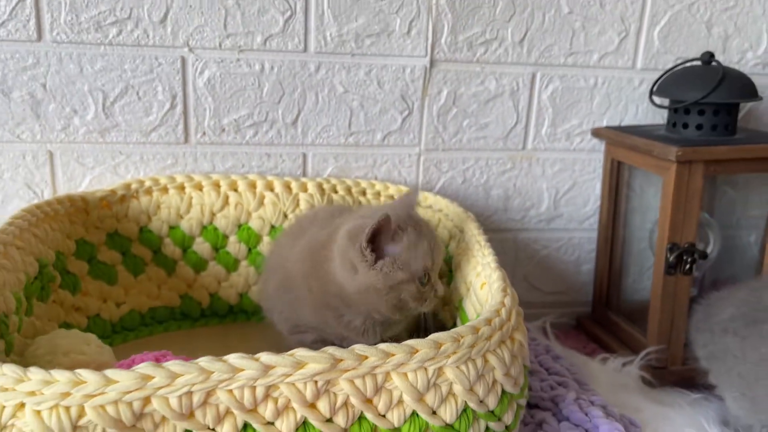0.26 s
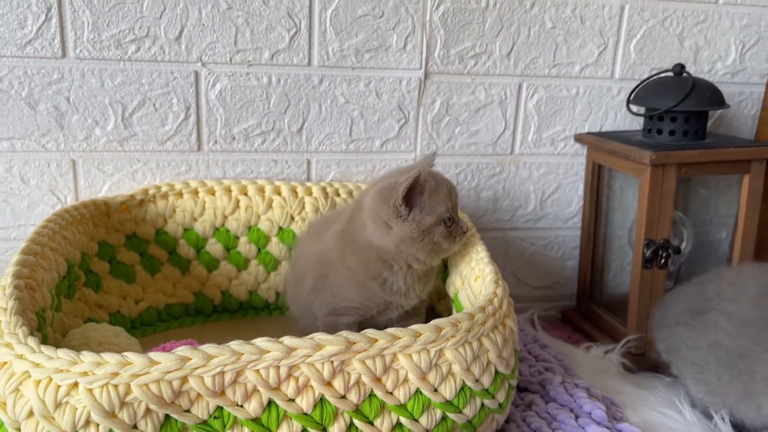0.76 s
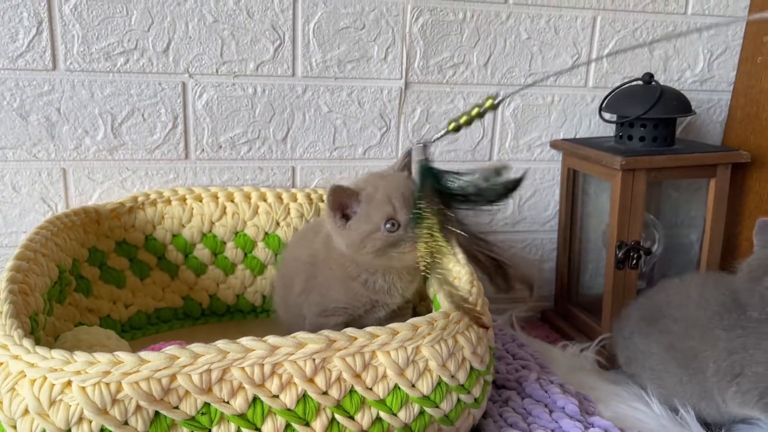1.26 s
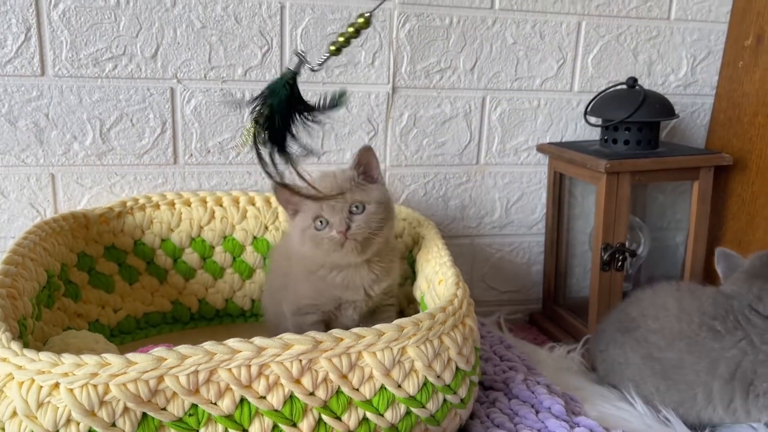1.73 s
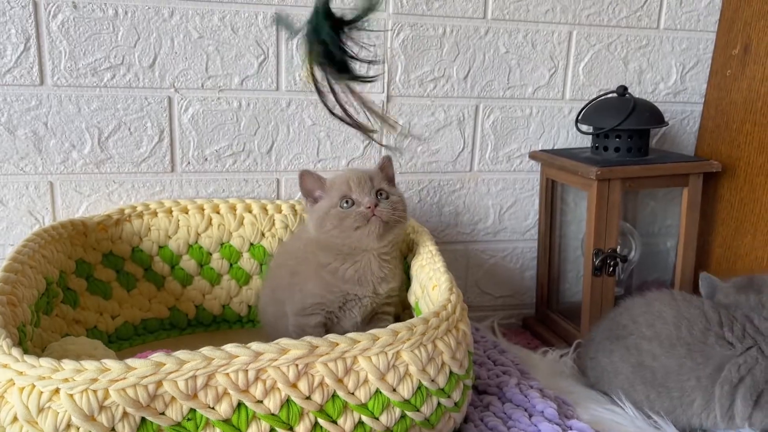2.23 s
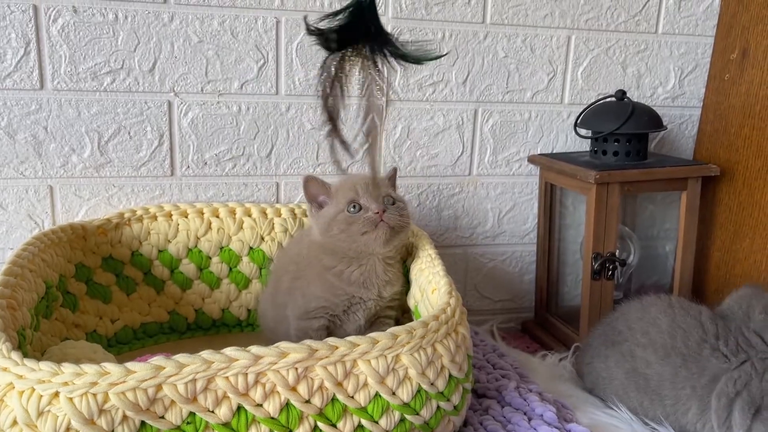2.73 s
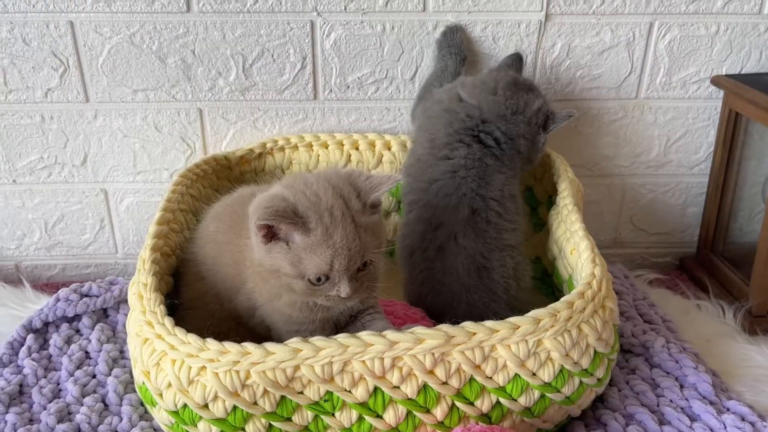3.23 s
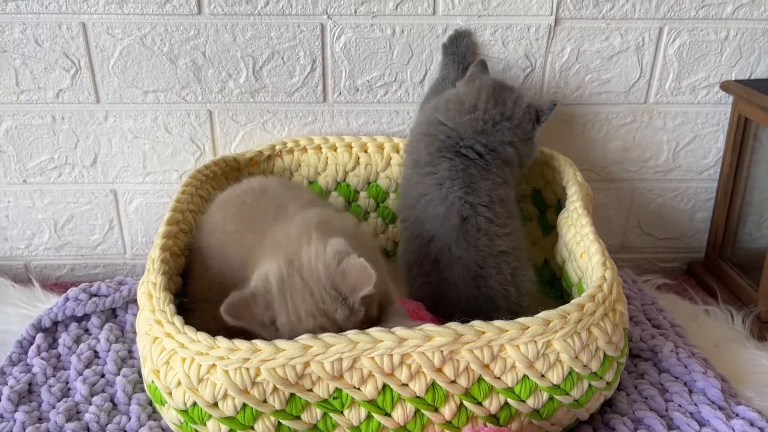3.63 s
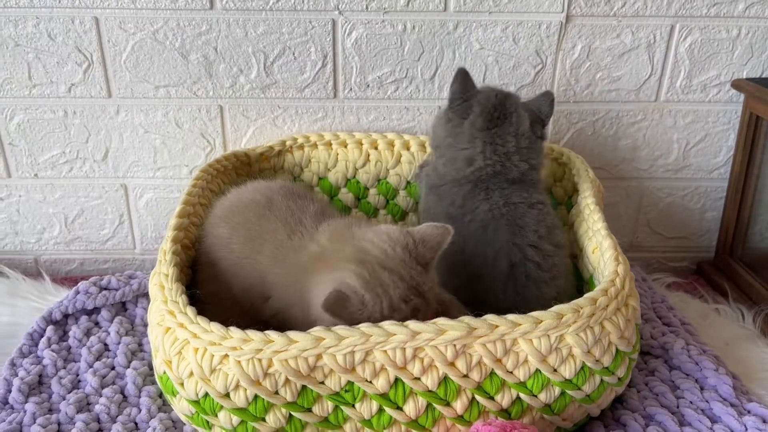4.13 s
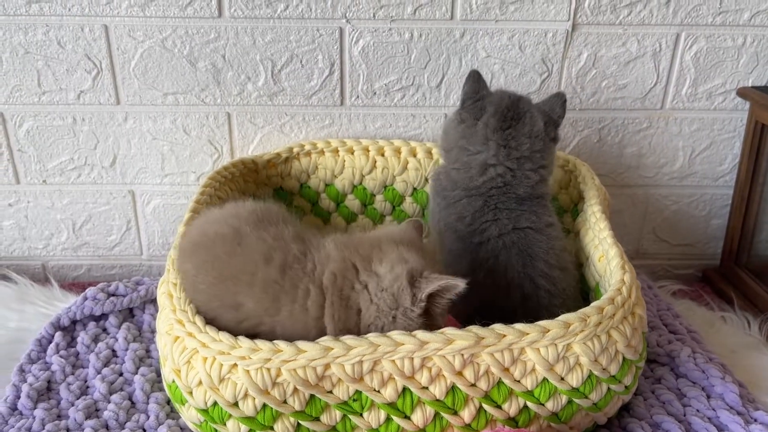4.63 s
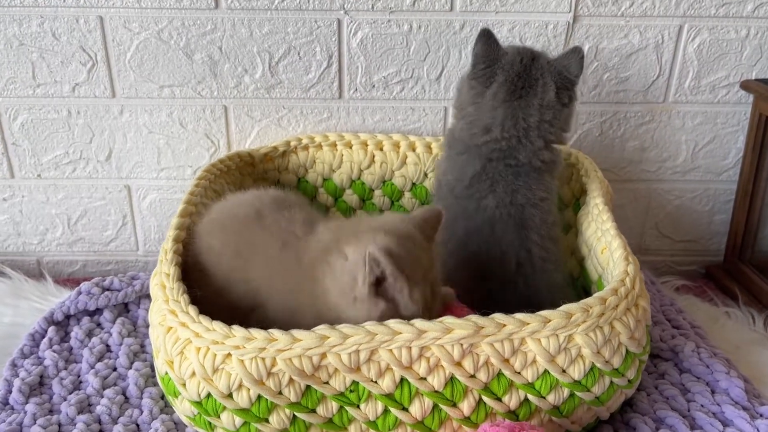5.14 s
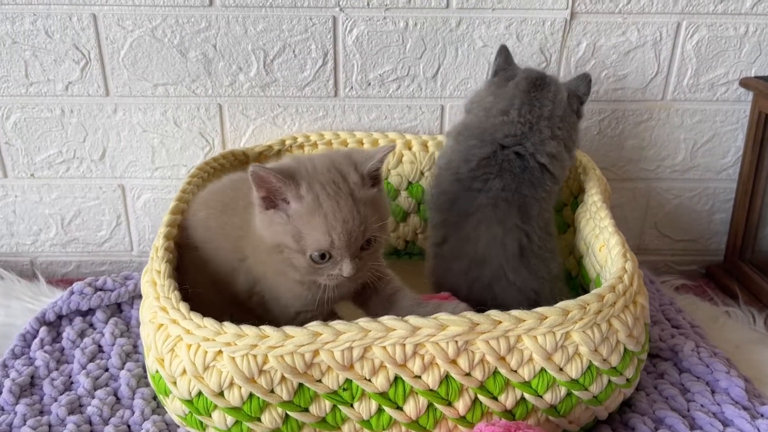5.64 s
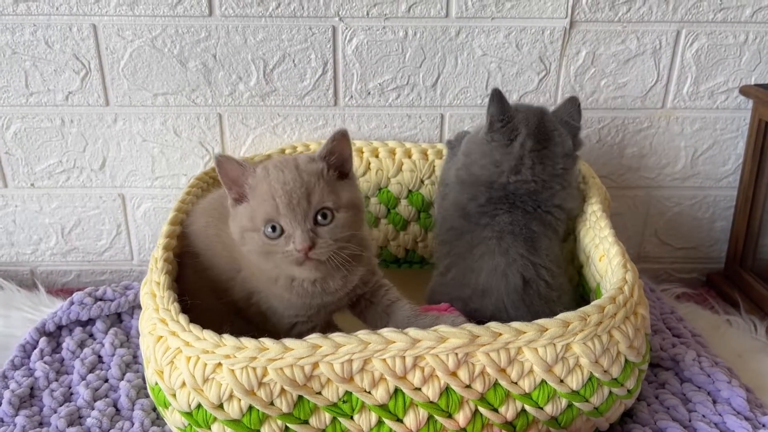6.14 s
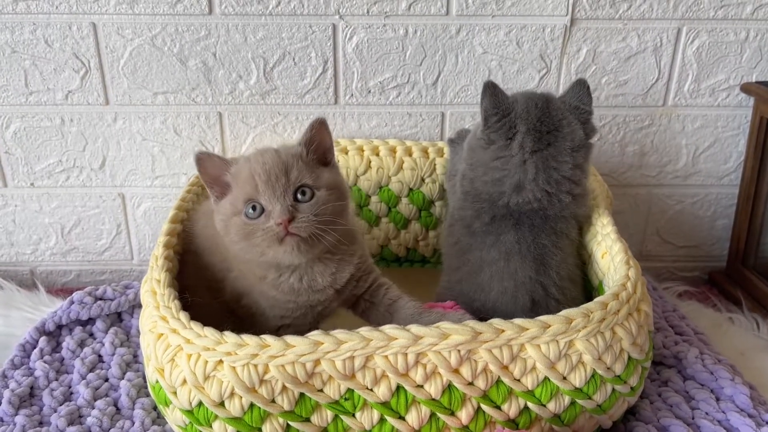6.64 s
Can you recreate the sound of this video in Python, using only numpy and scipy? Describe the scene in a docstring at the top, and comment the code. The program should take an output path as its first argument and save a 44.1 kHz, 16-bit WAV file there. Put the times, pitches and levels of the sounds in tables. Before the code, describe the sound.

A small furnished room, picked up close by a phone in stereo, near sounds slightly left. Dull distant traffic and a low wavering hum continue throughout. From 0 to 0.7 s come very faint taps and tiny dry ticks, one clearer near 0.5. From 1.25 to 1.9 a feather toy crackles in short, bright bunches with fine rustle, then near sounds almost stop. Traffic swells around 2.7 with a faint engine drone; at 3.05 the background abruptly shifts. A soft fur swish peaks at 3.3 over another faint engine. At 3.65-3.8 padded thuds and harder taps surround a loud, sharp snap at 3.74, with a very short noisy tail. A barely audible swish follows at 4.0. Rustle begins around 4.35, and from 4.5 to the end at 6.9 crisp, irregular crinkly ticks come in rapid jerks, strongest from 5.4 to 6.6, with light taps at 4.76 and 6.0.

```python
"""Distant traffic and a low hum run throughout, under soft knocks and bunches of dry ticks.
In two shots, a crinkly feather toy is shaken near kittens in a yarn basket in a small room.
Noise shaped into bursts makes the toy's ticks, rustle and swishes; noise also makes the traffic and hum.
Engines are sums of sine waves; the knocks and one sharp snap are short ringing tones.
"""
import sys
import numpy as np
from scipy import signal
from scipy.fft import rfft, irfft, next_fast_len
from scipy.io import wavfile
from scipy.ndimage import uniform_filter1d

SR = 44100
rng = np.random.default_rng(int(sys.argv[2]) if len(sys.argv) > 2 else 0)


def generate_wav(sig):
    """Save sig (samples, or channels by samples) to the path in sys.argv[1] as 16-bit PCM at SR."""
    pcm = np.round(np.clip(np.atleast_2d(sig).T, -1, 1) * 32767).astype(np.int16)
    wavfile.write(sys.argv[1], SR, pcm)


def amplitude_ratio(level_db):
    """Convert a level in decibels to the matching linear amplitude (field) ratio."""
    exponent = np.asarray(level_db, float) / 20
    return 10 ** exponent


N = 303849
TIME = np.arange(N) / SR
CUT_S = 3.055  # the second shot starts here

# Traffic spectrum, one list for each shot: pitch_hz, level_db (per Hz, before the swell)
TRAFFIC_COLOUR = [
    [(25, -82.0), (45, -75.0), (85, -80.0), (170, -86.0), (300, -95.0), (500, -100.0), (750, -99.0),
     (1050, -96.0), (1500, -101.0), (2000, -112.0), (2500, -125.0), (5000, -129.0), (11500, -128.0),
     (13500, -119.0), (16000, -120.0)],
    [(25, -83.0), (45, -75.5), (85, -77.0), (170, -87.0), (300, -85.0), (500, -92.0), (750, -95.0),
     (1050, -95.0), (1500, -101.0), (2000, -110.0), (2800, -117.0), (3600, -124.0), (5000, -125.0),
     (11500, -124.0), (13500, -117.0), (16000, -120.0)],
]
# How alike the two channels of traffic are, one list for each shot: pitch_hz, likeness (0 to 1)
TRAFFIC_LIKENESS = [
    [(60, 1), (290, 0.73), (1000, 0.14)],
    [(60, 0.5), (290, 0.2), (1000, 0.19)],
]
# Passing traffic swells: time_s, level_db
TRAFFIC_SWELL = [(0, -5), (1, -1), (2.4, 1), (2.7, 9), (3.05, 7.5), (3.06, 1.5), (4.6, 1), (6.89, -4)]
# Low hums: pitch_hz, width_hz, start_level_db, change_db_per_s
HUMS = [(56.7, 2.6, -57.5, -1.0), (121.47, 5.0, -62.5, 0.29), (226.5, 8.5, -76, 1)]
# Taps on something harder: start_s, level_db, upper_modes_db (over 900 Hz)
TAPS = [(.04, -56.5, 5.5), (.085, -52.5, -4), (.109, -59, -5), (.181, -60, -9), (3.649, -41.5, 2.5),
        (3.743, -40, 6), (4.7625, -42.5, -22), (6.002, -44.5, 2.5)]
# What a tap rings: pitch_hz, level_db, t60_s
TAP_MODES = [(298, -5.5, 0.039), (603, 3, 0.013), (945, 1.5, 0.0089), (1540, -2, 0.0049),
             (2460, -3, 0.0058)]
# Padded thuds of the basket: start_s, level_db
THUDS = [(3.651, -40), (3.796, -38.5)]
# What a thud rings: pitch_hz, level_db, t60_s
THUD_MODES = [(120.8, 0, 0.14), (274, -10, 0.13)]
# Single sharp ticks that stand out: time_s, level_db
SINGLE_TICKS = [(.099, -62), (0.119, -59.5), (.168, -65.5), (0.267, -53), (0.304, -54), (.414, -67),
                (0.455, -56), (0.493, -37), (.592, -68), (1.145, -66), (1.248, -52.5), (1.327, -34),
                (1.3385, -42), (1.4561, -32), (1.4684, -41.5), (1.5466, -37.5), (1.5555, -50),
                (1.591, -35.5), (1.6015, -41), (1.6083, -42), (1.7345, -47), (1.7376, -42), (1.75, -45),
                (1.863, -42), (1.886, -40), (1.891, -51), (1.9012, -40), (1.915, -43.5), (2.151, -63.5),
                (3.122, -64), (3.312, -65), (4.492, -41.5), (4.618, -39), (4.6628, -39), (4.698, -34),
                (4.744, -47), (4.7667, -37), (4.807, -43), (4.839, -29), (4.8527, -39), (4.8644, -45),
                (4.926, -43), (4.9755, -38.5), (4.982, -42), (4.987, -40), (4.995, -38), (5.055, -38),
                (5.066, -34.5), (5.079, -38), (5.086, -30.5), (5.1408, -40.5), (5.16, -37), (5.219, -36),
                (5.3717, -31.5), (5.381, -31), (5.4597, -36), (5.5194, -27), (5.526, -25.5), (5.532, -34),
                (5.588, -34), (5.602, -38), (5.6145, -29.5), (5.6732, -31.5), (5.73, -39.5), (5.7485, -40),
                (5.7576, -40), (5.8363, -37.5), (5.844, -35.5), (5.854, -37.5), (5.89, -40),
                (5.9074, -34.5), (5.921, -40), (5.936, -41), (5.9928, -26.5), (6.031, -44), (6.0605, -36),
                (6.0655, -33.5), (6.0876, -37), (6.168, -26), (6.2121, -32.5), (6.229, -49), (6.2379, -32),
                (6.249, -41), (6.264, -37), (6.29, -42), (6.3, -37), (6.322, -43), (6.348, -30.5),
                (6.4911, -25), (6.505, -31), (6.549, -39), (6.5544, -36), (6.578, -33.5), (6.589, -36),
                (6.6686, -37.5), (6.701, -42), (6.7207, -41), (6.7353, -35.5), (6.826, -43), (6.875, -34),
                (6.888, -48)]
# Each jerk of the toy crackles in a bunch of ticks: start_s, length_ms, level_db,
# body_db (under 4.5 kHz against the treble)
TICK_BUNCHES = [(0.265, 12, -60.5, -14), (0.2903, 25, -69.5, -3), (0.32, 23, -65, -3),
                (0.428, 13.5, -70, -15), (0.443, 23, -66, -11), (0.488, 27, -54, -8), (0.6565, 28, -60, -9),
                (1.2686, 18.4, -58, -3.5), (1.323, 20.7, -50.5, -7.5), (1.4196, 6, -50.5, -12),
                (1.451, 24.6, -48.5, -6), (1.5456, 15.5, -51.5, -13), (1.5919, 17.4, -51, -10.5),
                (1.685, 7.4, -65, -13), (1.7142, 2.9, -51, -17), (1.735, 17.5, -55, -8.5),
                (1.828, 13.3, -65, -11.5), (1.8528, 21.4, -57.5, -11), (1.885, 30, -55.5, -9.5),
                (2.2256, 26, -63.5, -11.5), (2.451, 12, -65, -15), (3.171, 2.4, -76, 5), (3.434, 3, -76, 3),
                (3.6498, 1.3, -49.5, -2.5), (3.7135, 5, -58, -7), (3.719, 6, -47.5, -2),
                (4.492, 40, -56, -11.5), (4.582, 7.5, -53, -15), (4.6167, 14.5, -45.5, -12),
                (4.6411, 33.5, -48.5, -14.5), (4.681, 25, -45.5, -12.5), (4.743, 13.5, -51, -19),
                (4.765, 12.9, -44.5, -16), (4.797, 30.3, -55, -9.5), (4.842, 14.5, -45, -15.5),
                (4.897, 5.8, -54, -12), (4.918, 26.6, -52.5, -10), (4.964, 25.5, -50, -17),
                (5.02, 32.7, -48.5, -18.5), (5.055, 41.5, -44.5, -18.5), (5.1235, 56, -49, -12),
                (5.189, 12.4, -48.5, -27), (5.208, 23.5, -46.5, -14), (5.276, 18.8, -50.5, -9.5),
                (5.3653, 21.3, -40.5, -17), (5.408, 27, -58.5, -4), (5.4364, 31, -51, -11.5),
                (5.502, 7, -50, -15), (5.5197, 13.7, -40, -17.5), (5.5842, 35.8, -43, -13.5),
                (5.658, 30.6, -47.5, -19), (5.6959, 18.0, -43, -18), (5.7475, 22, -46, -15),
                (5.819, 8.24, -54, -18), (5.835, 28.3, -46.5, -17), (5.889, 5.4, -51, -14),
                (5.907, 18, -46, -10), (6.002, 17, -43.5, -15), (6.0552, 20.2, -47, -19.5),
                (6.079, 12, -49, -10.5), (6.167, 17.0, -46.5, -10.5), (6.2127, 5.7, -42, -24),
                (6.2316, 22.3, -52.5, -12), (6.2532, 17, -49.5, -11), (6.2887, 15.7, -47.5, -14),
                (6.318, 6.8, -54, -13), (6.3454, 18.3, -42, -20), (6.378, 16.0, -59.5, -6.5),
                (6.424, 8.5, -61.5, -15), (6.492, 19.5, -40.5, -13), (6.552, 20, -46, -12),
                (6.6454, 24.8, -46.5, -13), (6.691, 15.4, -53, -14), (6.715, 31.4, -44, -14),
                (6.776, 8.2, -52.5, -13), (6.8246, 4.9, -44.5, -12), (6.8609, 23.7, -55, -6)]
# Steady fine rustle while the toy is dragged about: time_s, level_db
RUSTLE_LEVEL = [(1.2, -100), (1.26, -75.5), (1.4, -69), (1.58, -71), (1.67, -83.5), (1.72, -74),
                (1.93, -74.5), (2.0, -100), (4.3, -94.5), (4.35, -69), (4.39, -61), (4.46, -56.5),
                (4.56, -59.5), (4.7, -59), (4.87, -67.5), (5.1, -58), (5.28, -60), (5.34, -65), (5.42, -64),
                (5.49, -60.5), (5.8, -62), (5.86, -61), (5.97, -65.5), (6.08, -58), (6.125, -72),
                (6.2, -59.5), (6.38, -66.5), (6.465, -73.5), (6.56, -51), (6.625, -61), (6.72, -59),
                (6.81, -78), (6.89, -66)]
# Colour of the toy, one list for each shot: pitch_hz, level_db
TOY_COLOUR = [
    [(1000, -11.5), (1800, -13), (2500, -10.5), (3400, 1), (4300, -3), (5200, -2.5), (7400, 6), (8700, 6.5),
     (11400, 6)],
    [(600, -14.5), (1100, -8), (2500, -4.5), (3400, -1), (4300, -4), (5100, 0.5), (6800, 2.5), (8700, 5),
     (11400, 7)],
]
# Distant engines, one list each: time_s, firing_rate_hz, level_db
ENGINE_RUNS = [
    [(2.5, 78.1, -82), (2.63, 78.1, -67), (2.79, 76.6, -62), (2.84, 75.6, -75), (3.0, 75.7, -76)],
    [(3.2, 70.65, -74), (3.41, 70.9, -72), (3.45, 70.85, -63.5), (3.63, 71.1, -64), (3.67, 72.2, -73),
     (4.2, 71.7, -76.5)],
]
# Tones of each engine: multiple (of the firing rate), level_db
ENGINE_ORDERS = [
    [(2, 4.5), (4, 6), (8, -8)],
    [(3, -6), (4, -0.5), (6, 4.5)],
]
# Fur swishes over the rim: start_s, peak_s, end_s, peak_level_db
FUR_SWISHES = [(3.16, 3.31, 3.4, -59.5), (3.955, 4.023, 4.07, -70.5)]
# Cracks of the snap in quick succession: start_s, peak_db, bright_modes_db (over 6 kHz)
SNAP_CRACKS = [(3.7427, -15, 11), (3.74305, -4, -3), (3.7438, -19, 3.5), (3.7445, -8.5, 0),
               (3.7462, -24, -4.5), (3.7494, -25, -3.5)]
# What each crack rings: pitch_hz, level_db, t60_s
SNAP_MODES = [(2190, -6, 0.0038), (2475, -4, 0.0048), (3250, 1.5, 0.0032), (4040, 2.5, 0.0032),
              (4630, 3.5, 0.0024), (5400, 1.5, 0.0028), (7400, 3.5, 0.003), (9300, 1, 0.0037),
              (11230, 1, 0.0028)]
# Quick and slow fade of the snap's tail: start_level_db, loss_db_per_s
SNAP_TAIL_FADES = [(-38, 313), (-61.5, 70)]
# Near sounds, left over right: pitch_hz, level_db
LEFT_COLOUR = [(400, 5.5), (1200, 3.5), (5000, 2), (8000, 0)]
# Colour of the phone's microphone ports: pitch_hz, level_db
PORT_COLOUR = [(20, -10.5), (38, 1), (9500, -1), (10200, -5.5), (10900, 1), (12000, -5.5), (13700, -23),
               (15000, -22), (16300, -25.5)]

# Traffic ranges are rumble, drone and tyre hiss; each takes a share of the swell
SWELL_SHARE = (0.4, 0.91, 0.31)
FLICKER_DB, FLICKER_S = (2, 1.5, 1.0), 0.079  # each range also flickers on its own

# Ticks: a single one has a fixed width; those inside a bunch vary around WIDTH_MS
TICK_MS, TICKS_PER_S, WIDTH_MS, WIDTH_SPREAD = 0.6, 260, 1.9, 0.7
TICK_SCATTER_DB = 4.5
FIRST_TICK_DB, BUNCH_FADE_DB = -5, -1.5  # first tick against the others; drift along the bunch
CLICK_DB = 4  # the one-sample click of a tick, against its noise
TICK_BODY_DB, RUSTLE_BODY_DB, USUAL_BODY_DB = -19, -7, -10  # single ticks, rustle, plain colour
# Every tick favours other parts of the spectrum
PARTS_HZ, PATCHY_DB = (1513, 2550, 3600, 5030, 6960, 9000, 11800), 4
BLUR_DB, BLUR_EDGE_MS = -7.5, 3.0  # ticks too dense to part fill the bunch
LINGER_DB, LINGER_S = -14, 0.015  # the feathers settle after a bunch
NEAR_LIKENESS = (0.16, 0.81)  # of the toy's two channels, under and over TREBLE_FROM_HZ

ENGINE_WOBBLE = 0.005  # random drift of the firing rate, as a fraction
ENGINE_WAVER_DB, ENGINE_WAVER_S = 1.5, 0.035

SWISH_RANGE_DB = (17.5, 24.5)  # how far under its peak a swish starts and ends
SNAP_TAIL_START_S, SNAP_TAIL_END_S, SNAP_TAIL_HZ = 3.746, 4.05, (2600, 7000)
SNAP_TAIL_ROUGH_DB, SNAP_TAIL_GRAIN_MS = 3.5, 2  # random roughness of the tail

ROOM_T60_S, ROOM_DB, ROOM_GAP_S = 0.15, -9.5, 0.0011
# The phone steers its channels: on the right the treble is early and inverted, the rest slightly late
TREBLE_LEAD_S, TREBLE_FROM_HZ, BASS_LAG_S = 0.000295, 7600, 0.000023


def curve(rows, column=1):
    """Join table rows by straight lines in time."""
    rows = np.array(rows, float)
    return np.interp(TIME, rows[:, 0], rows[:, column])


def shape(points, hz):
    """Read (Hz, value) points on a log-frequency axis."""
    points = np.array(points, float)
    return np.interp(np.log(hz + 1), np.log(points[:, 0] + 1), points[:, 1])


def colour(x, points):
    """Filter to a (Hz, dB) spectrum without sounding ahead of time, using the folded cepstrum."""
    gain = amplitude_ratio(shape(points, np.fft.rfftfreq(4096, 1 / SR)))
    cepstrum = irfft(np.log(gain))
    cepstrum[1:2048] *= 2
    cepstrum[2049:] = 0
    response = irfft(np.exp(rfft(cepstrum)))
    return signal.oaconvolve(x, response[None], axes=1)[:, :N]


def band(x, lo_hz, hi_hz, order=2):
    """Keep the sound between two frequencies."""
    return signal.sosfilt(signal.butter(order, [lo_hz, hi_hz], "band", fs=SR, output="sos"), x)


def pair(alike):
    """Noise for two channels, partly shared."""
    share = np.clip(alike, 0, 1)
    common = rng.standard_normal(N)
    own = rng.standard_normal((2, N))
    return np.sqrt(share) * common + np.sqrt(1 - share) * own


def wander(hold_s):
    """Smoothed noise of spread 1 that changes about every hold_s."""
    size = int(hold_s * SR) + 1
    smooth = uniform_filter1d(uniform_filter1d(rng.standard_normal(N), size), size)
    return smooth * np.sqrt(1.5 * size)  # smoothing shrank the spread


def ring(hz, t60, length_s):
    """One tone dying away by 60 dB in t60 seconds."""
    t = np.arange(int(length_s * SR)) / SR
    return np.sin(2 * np.pi * hz * t) * np.exp(-np.log(1000) * t / t60)


def add(out, s, sound):
    """Mix a sound in at time s."""
    i = int(s * SR)
    out[..., i:i + sound.shape[-1]] += sound[..., :max(N - i, 0)]


def split(x):
    """Part a sound into what lies under and over TREBLE_FROM_HZ."""
    hz = np.fft.rfftfreq(N, 1 / SR)
    low = irfft(rfft(x) / (1 + (hz / TREBLE_FROM_HZ) ** 24), N)
    return low, x - low


def traffic():
    """Dull noise whose channels share most in the bass; one swell moves three ranges by their shares."""
    hz = np.fft.rfftfreq(N, 1 / SR)
    low = 1 / (1 + (hz / 130) ** 4)
    high = 1 / (1 + (750 / (hz + 1)) ** 4)
    shots = []
    for points, likeness in zip(TRAFFIC_COLOUR, TRAFFIC_LIKENESS):
        alike = np.clip(shape(likeness, hz), 0, 1)
        noise = rfft(rng.standard_normal((3, N))) * np.sqrt(SR / 2)
        stereo = np.sqrt(alike) * noise[2] + np.sqrt(1 - alike) * noise[:2]
        spectrum = stereo * amplitude_ratio(shape(points, hz))
        shot = 0
        for weight, share, flicker_db in zip((low, 1 - low - high, high), SWELL_SHARE, FLICKER_DB):
            level_db = share * curve(TRAFFIC_SWELL) + flicker_db * wander(FLICKER_S)
            shot = shot + amplitude_ratio(level_db) * irfft(spectrum * weight, N)
        shots.append(shot)
    return np.where(TIME < CUT_S, *shots)


def hum():
    """Narrow low resonances driven by noise, so they waver."""
    out = 0
    for hz, width, db, db_per_s in HUMS:
        noise = np.where(TIME < CUT_S, pair(0.96), pair(0.72))
        tone = band(noise, hz - width / 2, hz + width / 2, order=1)
        out = out + amplitude_ratio(db + db_per_s * TIME) * tone / np.std(tone)
    return out


def knocks(thud_rise_s=0.0039, tap_rise_s=0.0008):
    """Padded bumps ring low modes with a soft start; harder taps wake the upper modes."""
    out = np.zeros(N)
    age = np.arange(int(0.4 * SR)) / SR
    for s, db in THUDS:
        thud = sum(amplitude_ratio(g) * ring(hz, t60, 0.4) for hz, g, t60 in THUD_MODES)
        add(out, s, amplitude_ratio(db) * thud * (1 - np.exp(-age / thud_rise_s)))
    for s, db, upper_db in TAPS:
        tap = sum(amplitude_ratio(g + upper_db * (hz > 900)) * ring(hz, t60, 0.4) for hz, g, t60 in TAP_MODES)
        add(out, s, amplitude_ratio(db) * tap * (1 - np.exp(-age / tap_rise_s)))
    return out


def tick_rows():
    """All ticks as (s, power, width ms, body dB); the ticks of a bunch share its energy."""
    rows = [(s, amplitude_ratio(2 * db), TICK_MS, TICK_BODY_DB) for s, db in SINGLE_TICKS]
    for s, ms, db, body_db in TICK_BUNCHES:
        n = int(np.clip(1 + round(ms / 1000 * TICKS_PER_S), 1, 8))
        width = np.minimum(WIDTH_MS * np.exp(WIDTH_SPREAD * rng.standard_normal(n)), ms / 2)
        # the first tick opens the bunch; each follower falls at random inside its own slot
        slots = np.append(0, np.arange(n - 1) + rng.random(n - 1)) / max(n - 0.5, 1)
        tick_db = TICK_SCATTER_DB * rng.standard_normal(n) + BUNCH_FADE_DB * slots
        tick_db[0] += FIRST_TICK_DB
        share = amplitude_ratio(2 * tick_db)
        power = amplitude_ratio(2 * db) * ms * share / share.sum() / width
        rows += zip(s + slots * ms / 1000, power, width, n * [body_db])
    return rows


def body_power(db):
    """Power of each part of the spectrum for a given body against the treble."""
    return amplitude_ratio(2 * (db - USUAL_BODY_DB) * (np.array(PARTS_HZ)[:, None] < 4500))


def patchy_power():
    """Random power for each part of the spectrum, so no two ticks have the same colour."""
    return amplitude_ratio(2 * PATCHY_DB * rng.standard_normal((len(PARTS_HZ), 1)))


def tick_bursts(rise=1.05, fall=1.14):
    """Each tick is a noise burst with a steep, rounded start and a slower fade, plus a click."""
    bursts, clicks = np.zeros((2, len(PARTS_HZ), N))
    ms = np.arange(-0.02 * SR, 0.05 * SR) * 1000 / SR
    for s, power, width_ms, body_db in tick_rows():
        age = ms / max(width_ms, 0.2)
        burst = power * np.exp(-2 * np.where(ms < 0, (age / rise) ** 2, age / fall))
        tint = body_power(body_db) * patchy_power()
        add(bursts, s - 0.02, burst * tint)
        add(clicks, s, amplitude_ratio(CLICK_DB) * np.sqrt(power * tint))
    return bursts, clicks


def rustle_bed():
    """Power of the steady rustle, the blur that fills each bunch and the feathers settling after it."""
    held = np.zeros((len(PARTS_HZ), N))
    for s, length_ms, db, body_db in TICK_BUNCHES:
        power = amplitude_ratio(2 * db) * patchy_power() * body_power(body_db)
        add(held, s + BLUR_EDGE_MS / 2000, power * np.ones(int(length_ms * SR / 1000)))
    blur = np.abs(uniform_filter1d(held, int(BLUR_EDGE_MS * SR / 1000) + 1))
    linger = signal.lfilter([1 / (LINGER_S * SR)], [1, -np.exp(-1 / (LINGER_S * SR))], held)
    steady = amplitude_ratio(2 * curve(RUSTLE_LEVEL)) * body_power(RUSTLE_BODY_DB)
    return steady + amplitude_ratio(2 * BLUR_DB) * blur + amplitude_ratio(2 * LINGER_DB) * linger


def fine_grains(rate_per_s=1500, scatter_db=4.0, fade_ms=1.0):
    """Tiny random hits, each fading fast, as a roughness to multiply a level by."""
    hits = rng.random(N) < rate_per_s / SR
    hits = hits * amplitude_ratio(scatter_db * np.minimum(rng.exponential(size=N), 3))
    grains = 0.5 + signal.lfilter([1], [1, -np.exp(-1000 / (fade_ms * SR))], hits)
    return grains / np.sqrt(np.mean(grains ** 2))


def toy():
    """Crinkly ticks and rustle: noise in seven parts of the spectrum, each following its own power."""
    bursts, clicks = tick_bursts()
    grains = fine_grains()
    # the same grains roughen the bed and, more weakly, the inside of every tick
    gains = np.sqrt(bursts * grains ** 0.54 + rustle_bed() * grains ** 2)
    size = next_fast_len(N)
    noise = split(pair(NEAR_LIKENESS[0]))[0] + split(pair(NEAR_LIKENESS[1]))[1]
    fibres = rfft(noise, size)
    hz = np.linspace(0, SR / 2, fibres.shape[1])
    crackle = 0
    for gain, click, only in zip(gains, clicks, np.eye(len(PARTS_HZ))):
        weight = shape(list(zip(PARTS_HZ, only)), hz)  # 1 at this part, 0 at the others
        hiss_part = irfft(fibres * weight, size)[..., :N]
        click_part = irfft(rfft(click, size) * weight, size)[..., :N]
        crackle = crackle + gain * hiss_part + click_part
    first = colour(crackle * (TIME < CUT_S), TOY_COLOUR[0])
    second = colour(crackle * (TIME >= CUT_S), TOY_COLOUR[1])
    return first + second


def engines():
    """A few multiples of each firing rate carry through the walls as wavering sine tones."""
    out = np.zeros((2, N))
    for rows, orders in zip(ENGINE_RUNS, ENGINE_ORDERS):
        rate_hz = curve(rows) * (1 + ENGINE_WOBBLE * wander(ENGINE_WAVER_S))
        phase = 2 * np.pi * np.cumsum(rate_hz) / SR
        on = (TIME > rows[0][0]) & (TIME < rows[-1][0])
        for multiple, db in orders:
            level_db = curve(rows, column=2) + db + ENGINE_WAVER_DB * wander(ENGINE_WAVER_S)
            tone = np.sin(round(multiple) * phase + rng.normal(0, 0.3, (2, 1)))
            out += on * amplitude_ratio(level_db) * tone
    return out


def broad_hiss():
    """Smooth broad noise, a quarter of it shared by the channels."""
    return band(pair(0.25), 1100, 13000, order=1)


def swishes():
    """Hiss of fur and yarn sliding: broad noise that swells to a peak and fades."""
    gain = 0
    for start, peak, end, db in FUR_SWISHES:
        below_db = np.interp(TIME, [start, peak, end], [SWISH_RANGE_DB[0], 0, SWISH_RANGE_DB[1]])
        gain = gain + amplitude_ratio(db - below_db) * (TIME > start) * (TIME < end)
    return gain * band(broad_hiss(), 1800, 9200, order=1)


def snap():
    """Something taut lets go: a few cracks ring short, bright modes, neighbours in opposite phase."""
    out = np.zeros(N)
    for s, db, bright_db in SNAP_CRACKS:
        crack = 0
        for k, (hz, g, t60) in enumerate(SNAP_MODES):
            crack = crack + (-1) ** k * amplitude_ratio(g + bright_db * (hz > 6000)) * ring(hz, t60, 0.06)
        crack = band(crack, 1400, 16000)
        add(out, s, amplitude_ratio(db) * crack / np.abs(crack).max())
    return out


def snap_tail():
    """The room's noisy tail after the snap: broad noise with a quick and a slow fade."""
    age = np.abs(TIME - SNAP_TAIL_START_S)
    quick, slow = (amplitude_ratio(db - rate * age) for db, rate in SNAP_TAIL_FADES)
    rough = amplitude_ratio(SNAP_TAIL_ROUGH_DB * wander(SNAP_TAIL_GRAIN_MS / 1000))
    gain = (quick + slow) * rough * (TIME > SNAP_TAIL_START_S) * (TIME < SNAP_TAIL_END_S)
    hiss = broad_hiss()
    return gain * (band(hiss, *SNAP_TAIL_HZ) + amplitude_ratio(1.5) * hiss)


def room(x):
    """Short diffuse tail of a soft-furnished room, different in each channel."""
    t = np.arange(int(0.4 * SR)) / SR
    tail = rng.standard_normal((2, len(t))) * np.exp(-np.log(1000) * t / ROOM_T60_S) * (t > ROOM_GAP_S)
    tail *= amplitude_ratio(ROOM_DB) / np.linalg.norm(tail, axis=1, keepdims=True)
    return signal.oaconvolve(x, tail, axes=1)[:, :N]


def steer(direct):
    """Shift the right channel: treble early and inverted, the rest slightly late."""
    low, high = split(direct[1])
    late_low = np.roll(low, int(round(BASS_LAG_S * SR)))
    early_high = np.roll(high, -int(round(TREBLE_LEAD_S * SR)))
    return np.array([direct[0], late_low - early_high])


def scene():
    """Near sounds, a little louder on the left, with the room's answer over the far background."""
    near = knocks() + toy() + swishes() + snap_tail()
    crack = snap()
    out = steer(near + crack) + room(near + amplitude_ratio(-10.5) * crack)
    out[:1] = colour(out[:1], LEFT_COLOUR)
    return out + traffic() + hum() + engines()


def top_cut(x):
    """Nothing passes above the cut-off."""
    return signal.sosfilt(signal.butter(12, 16590, fs=SR, output="sos"), x)


def record(dry):
    """A phone's ports colour the sound, with notches and a dull top."""
    finished = colour(dry, PORT_COLOUR)
    return top_cut(finished)


dry = scene()
out = record(dry)
generate_wav(out)
```